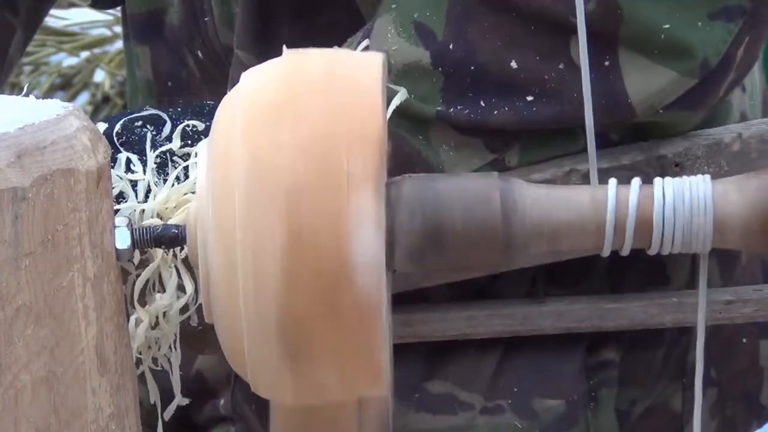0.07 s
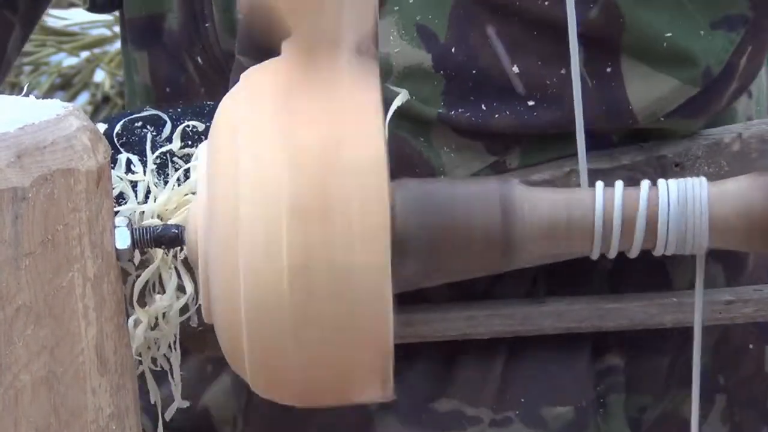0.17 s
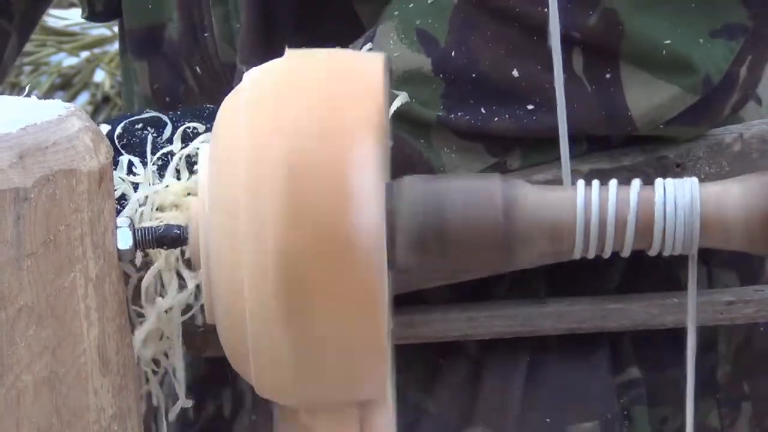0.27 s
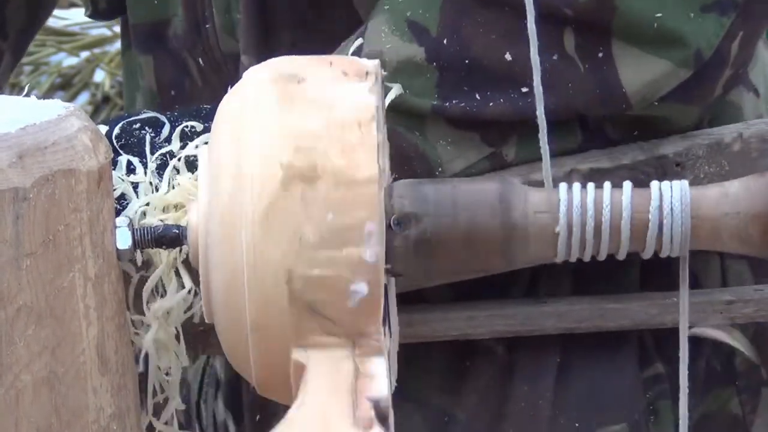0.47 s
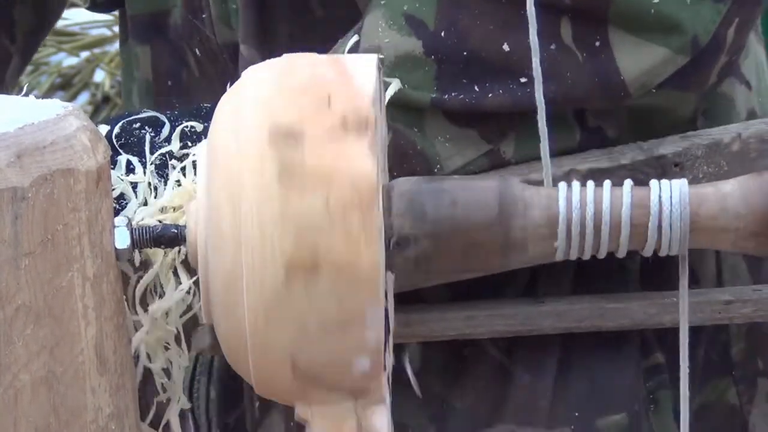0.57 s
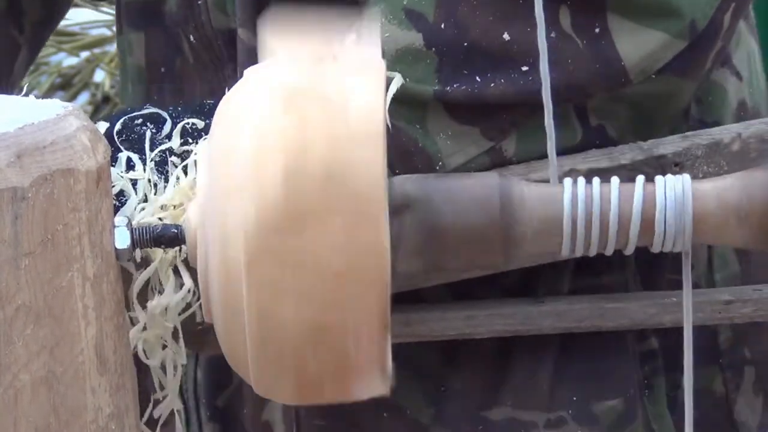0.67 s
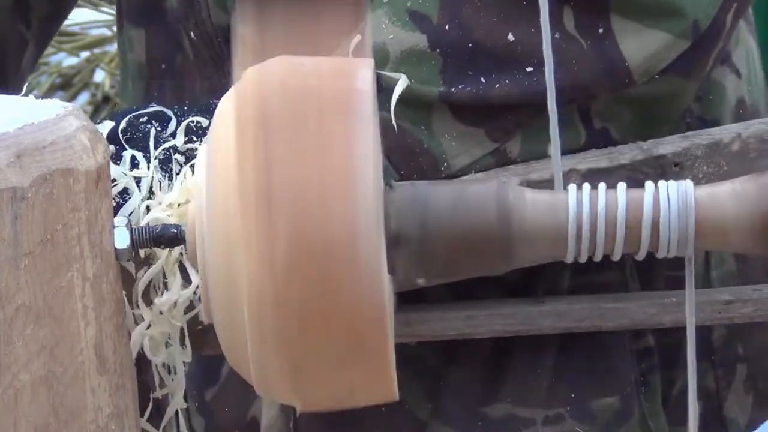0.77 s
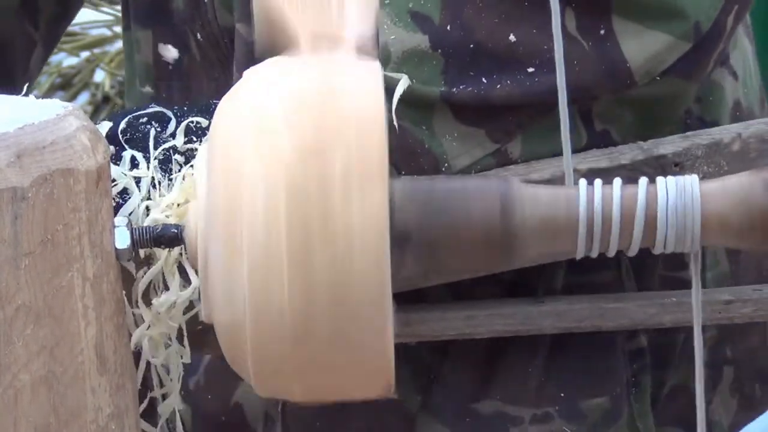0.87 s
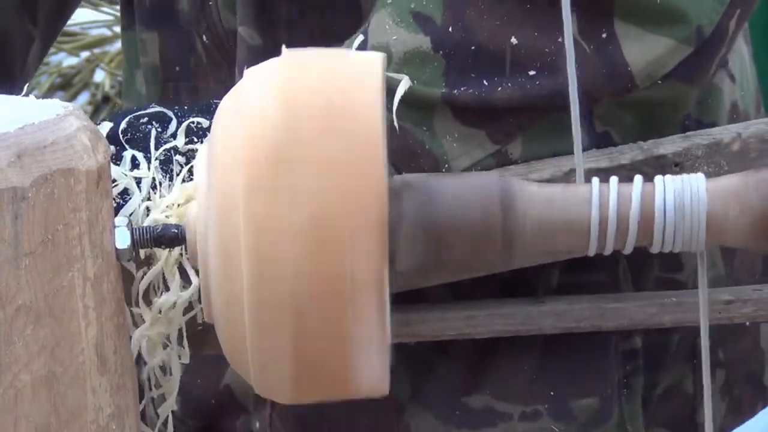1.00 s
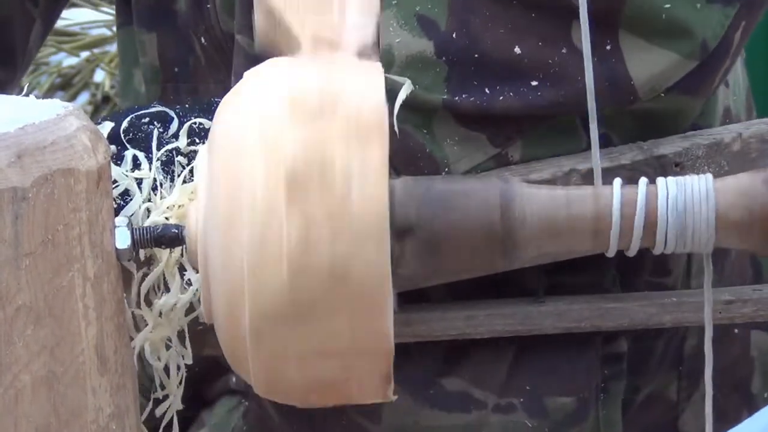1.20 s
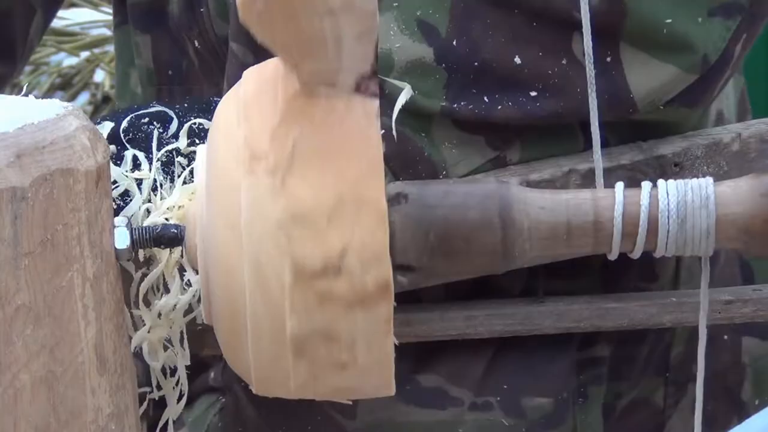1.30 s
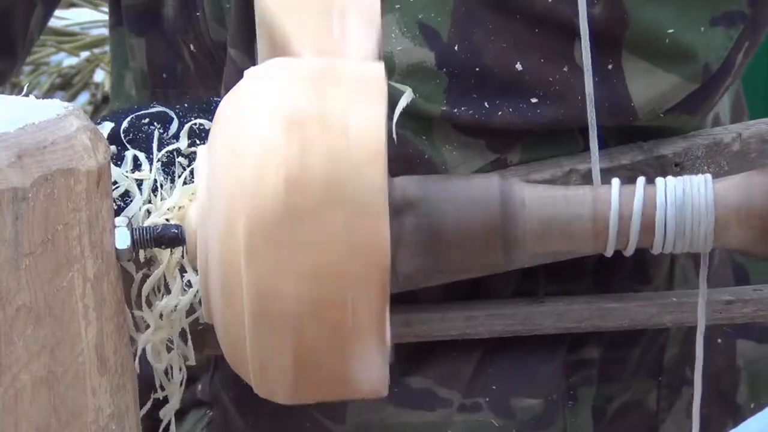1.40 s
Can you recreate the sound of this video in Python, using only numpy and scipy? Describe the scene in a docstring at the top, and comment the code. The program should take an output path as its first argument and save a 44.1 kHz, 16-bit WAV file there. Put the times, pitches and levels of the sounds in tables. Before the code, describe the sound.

One hissing scrape of a tool on a turning wooden bowl, ending in juddering knocks.

```python
"""One stroke of a pole lathe

A hook tool touches a wooden bowl spinning on a foot-powered lathe, bites and tears off a shaving.
As the bowl slows, the hiss of snapping fibres coarsens into a judder and the tool stalls with a few
knocks. The bowl spins back with light scuffs, rattles and the swish of the cord. Behind it are quiet
outdoor air and the rumble of the treadle (the foot pedal)."""
import sys
import numpy as np
from scipy import signal
from scipy.fft import rfft, irfft, next_fast_len
from scipy.io import wavfile
from scipy.ndimage import uniform_filter1d, minimum_filter1d, map_coordinates

SR = 44100
rng = np.random.default_rng(int(sys.argv[2]) if len(sys.argv) > 2 else 0)


def file_out(sig):
    """Save sig as 16-bit WAV at sys.argv[1]."""
    # one column per channel
    cols = np.atleast_2d(sig).T
    # limit, then scale
    lim = np.clip(cols, -1, 1)
    pcm = np.round(lim * 32767).astype(np.int16)
    wavfile.write(sys.argv[1], SR, pcm)


N = 63945

# tone of the outdoor air (frequency [Hz], level [dB])
AIR_TONE = [(40, -12), (800, -1.5), (1200, -4), (2500, -14), (5500, -17), (7800, -14.5), (11000, -27),
            (15500, -29.5)]
# resonances of the idling spindle (frequency [Hz], width [Hz], level [dB])
WHIRR_MODES = [(196, 38, -3.5), (401.3, 15.5, 1), (610, 9.1, -0.5)]
# tone of the treadle's rumble (frequency [Hz], level [dB])
RUMBLE_TONE = [(20, -30), (50, -10.5), (160, -5), (600, -46)]
# soft thumps of the treadle (time [s], level [dB], pitch [Hz])
THUMPS = [(0.305, -34.5, 124), (0.393, -33.5, 114), (0.949, -39, 62), (1.134, -38, 84), (1.193, -44.5, 104),
          (1.306, -36.5, 86.6), (1.354, -36.5, 56)]
# a short stereo echo with almost no high treble (frequency [Hz], time to fade by 60 dB [s])
ECHO_FADE = [(2000, 0.068), (7000, 0.39), (12000, 0.01)]
# where the lathe sits between the ears (frequency [Hz], left minus right [dB])
BALANCE = [(200, -8.5), (550, 2.5), (1200, -0.5)]

# the cord swishes round the mandrel, the shaft that carries the bowl (time [s], level [dB])
SWISH_LEVEL = [(.9, -70), (1.1, -58.5), (1.42, -86)]
# the cord's turns slip with small ticks (time [s], level [dB])
CORD_TICKS = [(.093, -41), (.759, -39), (.867, -36.5), (1.041, -41), (1.37, -40)]
# tone of the cord (frequency [Hz], level [dB])
CORD_TONE = [(5500, -10), (7700, 2), (15000, -37)]
# the shaving brushes the bowl (time [s], level [dB], fade time [s])
SCUFFS = [(.608, -30, .005), (.623, -28.5, 0.0056), (.637, -28.5, 0.0059), (.72, -40.5, 0.006),
          (.913, -33.5, 0.0026)]
# tone of the scuffs (frequency [Hz], level [dB])
SCUFF_TONE = [(1200, 10.5), (8300, 5), (15000, -65)]
# the mandrel rattles on the points that hold it (time [s], level [dB], fade time [s])
RATTLES = [(.6, -41, 0.07), (.662, -36.5, 0.012), (.689, -41, 0.036), (.72, -45.5, 0.033),
           (.824, -43.5, 0.01), (.913, -51, 0.064), (1.27, -52, 0.0063), (1.44, -48.5, 0.029)]
# tone of the rattles (frequency [Hz], level [dB])
RATTLE_TONE = [(200, -26), (1200, -7.5), (2300, -4), (4000, -26), (12000, -58)]
# resonances of the rattling frame (frequency [Hz], width [Hz], level [dB])
FRAME_MODES = [(1160, 130, 0), (1550, 130, -4), (3400, 130, -10)]

# the edge grazes the bowl before it bites (time [s], level [dB], fade time [s])
GRAZES = [(.169, -24, 0.034), (.201, -17, 0.0056)]
# tone of that first touch (frequency [Hz], level [dB])
GRAZE_TONE = [(150, -9), (2500, -3), (3200, -5), (8600, -1.5), (10500, -15), (15500, -25)]
# resonances of the lightly held tool (frequency [Hz], width [Hz], level [dB])
TOOL_MODES = [(803, 26, -4), (1346, 78, 1.5), (2560, 120, -7.5), (4350, 105, 4.5)]
# brief singing notes: squeaks, then a ring of the wooden frame (time [s], level [dB], pitch [Hz])
SINGING_NOTES = [(0.322, -17, 4480), (0.414, -18, 1245), (0.447, -25.5, 844), (.607, -42, 3400),
                 (.639, -40.5, 3450), (0.701, -37, 1160)]
# low resonances of the bowl on its mandrel (frequency [Hz], width [Hz], level [dB])
MANDREL_MODES = [(408, 35, -5), (490, 45, -2), (704, 35, -2), (780, 40, -2), (858, 45, 0), (990, 55, -4),
                 (1820, 50, -9)]
# tone of the judder and knocks (frequency [Hz], level [dB])
JUDDER_TONE = [(30, -34), (200, -10.5), (310, -17.5), (400, 7.5), (520, 8), (630, -4), (1020, 4),
               (1150, 2.5), (2200, -10.5), (15000, -38.5)]
# last catches of the edge (time [s], peak level [dB])
CATCHES = [(.5515, -10.5), (.5585, -11.5), (0.5707, -10)]
# coarse tearing of the end grain (time [s], level [dB])
TEAR_LEVEL = [(.222, -71), (.238, -32), (.32, -26), (.37, -57), (.41, -30), (.49, -30.5), (.535, -18),
              (.568, -21), (.61, -37), (.68, -54)]

# how fast the bowl turns (time [s], speed [share of full speed])
BOWL_SPEED = [(.17, 1), (.3, 1.0), (.42, 0.84), (.5, 0.82), (.54, 0.42), (.575, 0.29)]
# how hard the edge presses (time [s], level [dB])
EDGE_PRESSURE = [(.215, -39), (.227, -24), (.262, -21), (.302, -22), (.312, -17), (.385, -16.5),
                 (.49, -19.5), (.53, -18.5), (.566, -21.5), (.572, -34.5), (.61, -41)]
# the edge bites deeper and a chip breaks out (time [s], level [dB], fade time [s])
CHIPS = [(.2265, -27, 0.0013), (.307, -17, 0.0047)]
# tone of the full cut (frequency [Hz], level [dB])
SHAVE_TONE = [(40, -57), (280, -14), (520, -8), (1450, -6), (2450, 0.5), (3200, -8), (4400, -5), (4900, -6),
              (7000, -3), (8700, -6), (10300, -16.5), (13000, -26.5), (15500, -36)]
# resonances of bowl and tool (frequency [Hz], width [Hz], level [dB])
BOWL_MODES = [(542, 94, -11), (842, 37, -5), (1213, 53, -2.5), (1627, 22, -1.5), (1808, 19.4, 2),
              (2044, 69, -3), (2430, 33.5, 4.5), (2539, 41, 2), (4003, 120, -6), (4526, 126, -5.5)]
# how freely the bowl rings as the cut deepens (time [s], level [dB])
BOWL_RING_LEVEL = [(.25, -3.5), (.35, -3.5), (.48, 1), (.56, -7)]

FIBRES_PER_S, CONTACTS_PER_S = 7000, 4300  # tiny impacts when cutting at full speed, and when rubbing


def amp(db):
    """Turn decibels into a gain."""
    return 10 ** (np.asarray(db) / 20)


def unit(x):
    """Scale a signal to an average (rms) level of 1."""
    return x / np.sqrt(np.mean(x ** 2) + 1e-20)


def along(points, hz):
    """Read between (frequency, value) points on a log frequency axis."""
    freqs, values = np.transpose(points)
    return np.interp(np.log(hz + 1), np.log(freqs + 1), values)


def curve(rows, outside=None):
    """Join (time, value) rows into one value per sample."""
    return np.interp(np.arange(N) / SR, *np.transpose(rows), left=outside, right=outside)


def wobble(rate):
    """A smooth curve through `rate` random values a second."""
    return map_coordinates(rng.standard_normal(N // 8), [np.arange(N) * rate / SR], mode="wrap")


def filtered(x, response):
    """Multiply each frequency in x by response(frequency)."""
    size = 2 * next_fast_len(N)
    return irfft(rfft(x, size) * response(np.fft.rfftfreq(size, 1 / SR)), size)[..., :N]


def colour(x, tone):
    """Give x the tone in a table, at an average level of 1."""
    def response(hz):
        # minimum phase: the filter never sounds before it is struck
        cepstrum = irfft(np.log(amp(along(tone, hz))))
        half = len(cepstrum) // 2
        cepstrum[1:half] *= 2
        cepstrum[half + 1:] = 0
        return np.exp(rfft(cepstrum))
    return unit(filtered(x, response))


def ring(x, modes):
    """Let x ring an object's resonances (its natural notes), at an average level of 1."""
    def response(hz):
        return sum((-1) ** k * amp(db) * 1j * hz * width / (pitch ** 2 - hz ** 2 + 1j * hz * width)
                   for k, (pitch, width, db) in enumerate(modes))
    return unit(filtered(x, response))


def snaps(rate, scatter_db=2.5):
    """Random clicks of uneven size, `rate` a second, equally strong overall at any rate."""
    chance = np.clip(rate / SR, 1e-4, 1)
    sizes = amp(scatter_db * np.clip(rng.standard_normal(N), -2, 2)) * rng.choice([-1, 1], N)
    return unit((rng.random(N) < chance) * sizes / np.sqrt(chance))


def bursts(rows, rise_s=0.00088):
    """A loudness curve that jumps up and dies away for each (time, level, fade time) row."""
    loudness = np.zeros(N)
    for start, db, fade_s in rows:
        age = np.maximum(np.arange(N) / SR - start, 0)
        loudness += amp(db) * (1 - np.exp(-age / rise_s)) * np.exp(-age / fade_s)
    return loudness


def outdoor_air(level_db=-49, spread_db=-17):
    """A quiet hiss of open air, slightly different in each ear."""
    mid, side = colour(rng.standard_normal((2, N)), AIR_TONE)
    side = side * amp(spread_db)
    return amp(level_db) * np.array([mid + side, mid - side])


def spindle_whirr(level_db=-55):
    """The idling spindle hums softly on three low notes."""
    return amp(level_db) * ring(rng.standard_normal(N), WHIRR_MODES)


def treadle(rumble_db=-56.5, spread_db=-8.5, pan_db=3):
    """The foot pedal rumbles and thumps softly, off to the right."""
    t = np.arange(N) / SR
    mid, side = amp(rumble_db) * colour(rng.standard_normal((2, N)), RUMBLE_TONE)
    for start, db, hz in THUMPS:
        swell = 2 * bursts([(start, db, 0.013)], rise_s=0.014)
        mid = mid + swell * np.sin(2 * np.pi * hz * (t - start))
    side = side * amp(spread_db)
    return np.array([mid + side, mid - side]) * amp([[-pan_db], [pan_db]])


def short_echo(x, level_db=-20):
    """A faint, short stereo echo with almost no high treble."""
    hz, t, noise = signal.stft(rng.standard_normal((2, SR // 2)), SR, nperseg=256)
    fade = amp(-60 * t / along(ECHO_FADE, hz)[:, None])
    tail = signal.istft(noise * fade, SR, nperseg=256)[1]
    return amp(level_db) * signal.fftconvolve(x[None], tail / np.linalg.norm(tail[0]), axes=1)[:, :N]


def cord(tick_s=0.0018, flutter_db=1.8):
    """The cord winds along the mandrel with a thin, uneven swish and bright ticks."""
    ticks = bursts([(start, db, tick_s) for start, db in CORD_TICKS])
    contacts = snaps(CONTACTS_PER_S)
    swish = amp(curve(SWISH_LEVEL, outside=-120) + flutter_db * wobble(rate=19.3))
    friction = contacts * (swish + ticks)
    return friction.std() * colour(friction, CORD_TONE)


def scuffs():
    """The shaving brushes the bowl as it spins back."""
    friction = snaps(CONTACTS_PER_S) * bursts(SCUFFS)
    return friction.std() * colour(friction, SCUFF_TONE)


def rattles(ring_db=-3.5):
    """The mandrel rattles on the way back and rings the wooden frame."""
    force = snaps(CONTACTS_PER_S) * bursts(RATTLES)
    return force.std() * unit(colour(force, RATTLE_TONE) + amp(ring_db) * ring(force, FRAME_MODES))


def graze():
    """The edge skims the spinning wood and the tool rings."""
    force = snaps(FIBRES_PER_S) * bursts(GRAZES, rise_s=0.0069)
    return force.std() * unit(colour(force, GRAZE_TONE) + ring(force, TOOL_MODES))


def singing_notes(half_length_s=0.012, waver_radians=0.91):
    """Brief, wavering notes: squeaks during and just after the cut, then a ring of the wooden frame."""
    t = np.arange(N) / SR
    sound = np.zeros(N)
    for middle, db, hz in SINGING_NOTES:
        swell = amp(db) * np.exp(-((t - middle) / half_length_s) ** 2)
        sound += swell * np.sin(2 * np.pi * hz * t + waver_radians * wobble(rate=213.2))
    return sound


def mandrel_ring(force, top_hz=2660):
    """The heavy bowl rings low and dull on its mandrel, with little above top_hz."""
    return unit(filtered(ring(force, MANDREL_MODES), lambda hz: 1 / (1 + 1j * hz / top_hz) ** 2))


def catches(ring_db=-10):
    """The edge catches and lets go, making single low knocks."""
    tap = signal.unit_impulse(N)
    knock = colour(tap, JUDDER_TONE) + amp(ring_db) * mandrel_ring(tap)
    knock = knock / np.abs(knock).max()
    return sum(amp(db) * np.pad(knock, (round(start * SR), 0))[:N] for start, db in CATCHES)


def judder(ring_db=1):
    """Coarse tears shake the bowl on its mandrel, most of all just before it stops."""
    force = snaps(rate=1100, scatter_db=2) * amp(curve(TEAR_LEVEL, outside=-120))
    return force.std() * unit(colour(force, JUDDER_TONE) + amp(ring_db) * mandrel_ring(force))


def cut(hiss_db=-0.5, dull_hz=2740, dull_power=0.68, grain_db=2):
    """Fibres snap under the edge and ring the bowl; a slower bowl gives fewer, duller snaps."""
    speed = curve(BOWL_SPEED)
    pressure = amp(curve(EDGE_PRESSURE, outside=-120)) + bursts(CHIPS)
    crackle = snaps(FIBRES_PER_S * speed) * pressure
    push = snaps(FIBRES_PER_S * speed) * pressure * amp(curve(BOWL_RING_LEVEL))
    hiss = amp(hiss_db) * crackle.std() * colour(crackle, SHAVE_TONE)
    ringing = push.std() * ring(push, BOWL_MODES)
    hz, t, spectrum = signal.stft(hiss + ringing, SR, nperseg=128)
    octaves_above = np.log2(1 + (hz[:, None] / dull_hz) ** 2) / 2
    dulling = np.interp(t, np.arange(N) / SR, speed) ** (dull_power * octaves_above)
    # uneven wood shifts the tone from moment to moment
    grain = uniform_filter1d(rng.standard_normal(spectrum.shape), size=4, axis=0)
    grain = unit(uniform_filter1d(grain, size=7, axis=1))
    return signal.istft(spectrum * dulling * amp(grain_db * grain), SR, nperseg=128)[1][:N]


def scene():
    """Place the lathe near the middle and add its surroundings."""
    def ear_gains(hz):
        lean_db = along(BALANCE, hz) / 2
        return amp([lean_db, -lean_db])
    lathe = graze() + cut() + singing_notes() + judder() + catches() + scuffs() + rattles() + cord()
    return filtered(lathe, ear_gains) + short_echo(lathe) + treadle() + outdoor_air() + spindle_whirr()


def record(dry, ceiling_db=-6.5, hold_s=0.0041, top_hz=15800):
    """A fast limiter turns down the loudest peaks; everything above top_hz is removed."""
    hold = round(hold_s * SR)
    needed = np.minimum(1, amp(ceiling_db) / (np.abs(dry).max(axis=0) + 1e-9))
    gain = uniform_filter1d(minimum_filter1d(needed, hold), hold)
    return filtered(dry * gain, lambda hz: hz < top_hz)


dry = scene()
out = record(dry)
file_out(out)
```